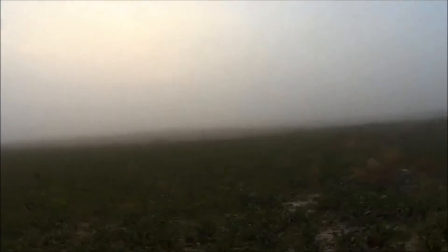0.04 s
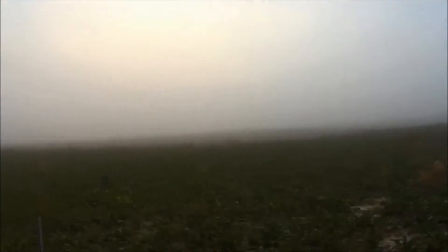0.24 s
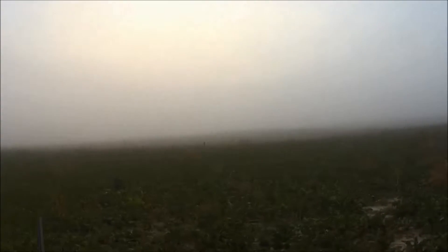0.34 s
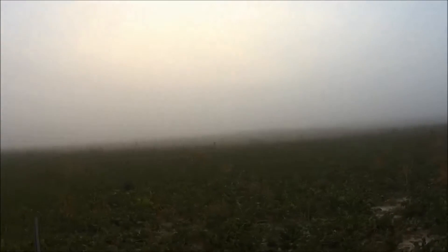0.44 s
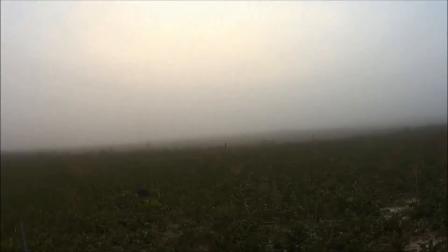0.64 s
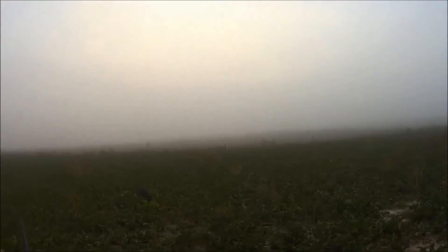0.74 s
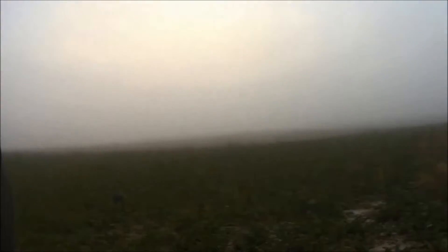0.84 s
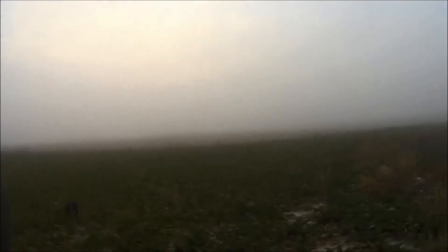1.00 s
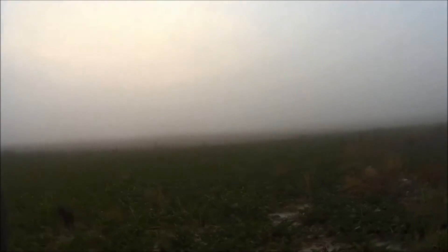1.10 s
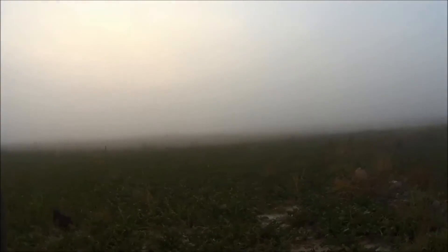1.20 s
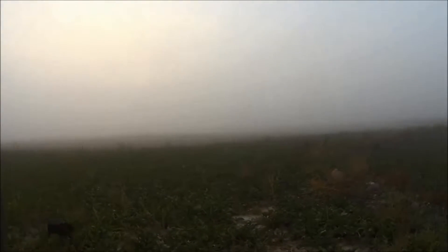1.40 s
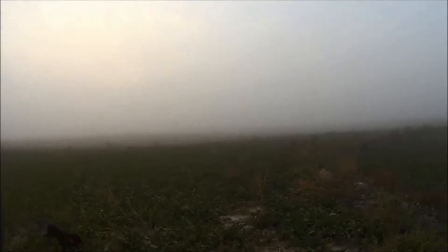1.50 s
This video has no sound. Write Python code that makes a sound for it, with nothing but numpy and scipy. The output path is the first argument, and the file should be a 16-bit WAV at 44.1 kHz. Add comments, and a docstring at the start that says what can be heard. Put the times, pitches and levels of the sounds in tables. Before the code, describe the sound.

An animal's small collar bell jangles in irregular runs over faintly rustling grass.

```python
"""An animal moves through rough grass in a hushed open field, a small sheet-metal bell on its collar.
From the start the clapper strikes and chatters in uneven runs; muffled, the low note goes flat and short.
Stalks snap, and from 0.25 s the grass swishes louder. Near 0.63 s a foot treads softly as a light wind
buffets the microphone. The strikes pause at 0.8 s and run again from 1.07 to 1.41 s.
A faint distant hum peaks near 1.5 s while the bell rings out."""
import sys
import numpy as np
from scipy import signal
from scipy.fft import rfft, irfft
from scipy.io import wavfile
from scipy.ndimage import uniform_filter1d

SR = 44100
rng = np.random.default_rng(int(sys.argv[2]) if len(sys.argv) > 2 else 0)


def store_wav(level_fs):
    """Save 16-bit WAV to argv[1]."""
    pcm = np.round(np.clip(np.atleast_2d(level_fs), -1, 1) * 32767)
    wavfile.write(sys.argv[1], SR, pcm.T.astype(np.int16))


N = 68355

# spectra of field hush, wind and grass: (frequency [Hz], relative density [dB])
HUSH_SPECTRUM = [(40, 6), (100, -2.5), (160, -6), (210, 1), (270, 2.5), (330, -2), (430, -1), (600, -2.5),
                 (900, -9.5), (2000, -6), (5000, -30.5), (11000, -62)]
WIND_SPECTRUM = [(15, -0.5), (28, -3), (50, 6.5), (75, -5), (100, -0.5), (150, -18), (300, -18.5),
                 (1000, -45)]
GRASS_SPECTRUM = [(150, 1.5), (500, 1.5), (1200, 0.5), (2500, 4), (4000, 2), (6000, 1), (7500, -10),
                  (9500, -6), (11000, -30)]
# hum fundamental and octave: (peak level [dB])
HUM_PARTIALS_DB = [-60, -61.5]
# wind strength: (time [s], relative level [dB])
WIND_GUSTS = [(0.0, -53.5), (0.158, -60), (0.518, -51), (0.63, -43.5), (0.828, -54), (0.84, -49),
              (1.052, -60), (1.476, -55.5), (1.55, -57)]
# movement through the grass: (time [s], relative level [dB])
GRASS_MOTION = [(0, -69), (.1, -66), (.15, -62), (.205, -67), (.25, -56), (.37, -55.5), (.42, -60),
                (.54, -58), (.6, -54), (.72, -55), (.82, -54.5), (.87, -57), (.96, -53.5), (1.01, -55),
                (1.05, -53.5), (1.1, -58), (1.2, -57.5), (1.3, -56), (1.42, -53.5), (1.55, -56.5)]
# stalk snaps and swishes: (time [s], level [dB], centre [Hz], decay [s])
STALK_SNAPS = [(.149, -46, 1500, .012), (.229, -42, 1400, .014), (.2927, -47, 4000, .003),
               (.329, -44, 5000, .003), (.335, -40, 4500, .002), (.371, -43, 4500, .004),
               (.503, -44, 6000, .002), (.519, -46, 5500, .003), (.572, -45, 4200, .025),
               (.8899, -43, 3800, .004), (.934, -45, 4500, .003), (1.0305, -36, 3800, .005),
               (1.065, -40, 4000, .005), (1.1533, -40, 4000, .003), (1.2235, -37, 2800, .002),
               (1.42, -43, 5500, .008), (1.428, -42, 5000, .003)]
# clapper strikes: (time [s], low note [Hz], low note t60 [s], rise [s], peaks of main modes 0-4 [dB])
CLAPPER_STRIKES = [(0.001, 1760.0, 0.16, 0.00067, -45, -64, -69.0, -83.0, -73),
                   (0.014, 1760.0, 0.18, 0.0025, -53, -57, -52.5, -83.0, -89),
                   (0.036, 1750.0, 0.07, 0.00033, -39, -54, -75, -69, -57),
                   (0.059, 1760.0, 0.033, 0.0014, -51, -74.0, -42, -77, -71),
                   (0.149, 1560.0, 0.015, 0.00029, -34.5, -63, -47, -73, -83.0),
                   (0.231, 1700.0, 0.019, 0.00038, -28.5, -61, -38.5, -34.5, -37.0),
                   (0.236, 1760.0, 0.12, 0.0047, -18.5, -33.5, -50.5, -45, -55),
                   (0.305, 1755.0, 0.23, 0.0024, -44.5, -49, -44.5, -42, -58),
                   (0.352, 1755.0, 0.52, 0.002, -41.5, -43.5, -43, -41.5, -45.5),
                   (0.371, 1680.0, 0.026, 0.0013, -28.5, -52, -57, -52, -39.5),
                   (0.46, 1745.0, 0.045, 0.0011, -20.5, -38, -44.5, -35.0, -38.5),
                   (0.486, 1748.0, 0.085, 0.0067, -26, -44, -49, -57, -76),
                   (0.5105, 1560.0, 0.014, 0.0022, -30.5, -54, -58, -72.0, -64),
                   (0.5255, 1630.0, 0.049, 0.0015, -27, -68, -77, -76, -87),
                   (0.5555, 1752.0, 0.07, 0.0058, -13.5, -40.5, -53.5, -36.5, -42.5),
                   (0.6685, 1760.0, 0.12, 0.001, -20, -35, -48, -39.5, -33),
                   (0.681, 1770.0, 0.045, 0.0038, -24.5, -55, -45.5, -52.0, -43.5),
                   (0.693, 1745.0, 0.079, 0.0023, -21, -61, -51, -48, -53),
                   (0.716, 1755.0, 0.15, 0.00092, -33.5, -74, -58, -59, -57),
                   (0.733, 1755.0, 0.16, 0.0014, -42, -66.0, -36, -63, -57),
                   (0.761, 1750.0, 0.095, 0.0014, -12.0, -37.5, -43.5, -33.5, -38),
                   (0.8005, 1725.0, 0.087, 0.001, -18.0, -40, -42, -37.5, -45.5),
                   (0.811, 1742.0, 0.11, 0.024, -25.5, -67, -81, -68, -77.5),
                   (1.065, 1755.0, 0.072, 0.0029, -21.5, -42.5, -49, -40, -49),
                   (1.088, 1750.0, 0.096, 0.0037, -30, -62.0, -53.5, -64, -72),
                   (1.121, 1605.0, 0.022, 0.0023, -21.5, -47, -43, -43.5, -56),
                   (1.1755, 1750.0, 0.1, 0.0034, -65, -40.5, -27.5, -36, -41.5),
                   (1.2385, 1745.0, 0.095, 0.002, -17.5, -39, -29, -40, -42),
                   (1.272, 1735.0, 0.12, 0.0005, -27, -39, -59, -36, -46),
                   (1.314, 1755.0, 0.082, 0.0024, -31, -49, -41.5, -44.5, -55),
                   (1.3655, 1750.0, 0.11, 0.00075, -27.5, -52, -43.5, -48, -50.5),
                   (1.414, 1760.0, 0.12, 0.0037, -41.0, -40, -40, -41.5, -57)]
# upper modes of the bell wall: (frequency [Hz])
WALL_MODE_HZ = [2186, 4522, 5093, 6328, 6522, 8007, 9292, 10977]
# per wall mode: (unmuffled t60 [s], level re its main mode [dB], left minus right [dB], left lead [rad])
WALL_MODES = [(0.086, -31.5, 10.5, -0.8), (0.072, -0.5, 2, -0.32), (0.066, 4, 2.1, -0.42),
              (0.36, -16, -1, -0.2), (0.051, -24.5, 6, 0.2), (0.094, -3, -3.3, -.3), (.12, 0.5, 0.5, 0.8),
              (.12, -26.5, -2, 0)]
# per wall mode: (main mode that sets its strength [index])
WALL_MAIN_MODE = [0, 1, 2, 1, 1, 3, 4, 4]
# per wall mode: (share of rattle and flutter [0-1])
WALL_ROUGHNESS = [.6, .9, .5, 1, 1, .9, 1, 1]

LOW_FREE_HZ = 1757  # unmuffled low note
TIME_S = np.arange(N) / SR


def undb(db):
    """Decibels to gain."""
    return 10 ** (np.asarray(db) / 20)


def unit(x):
    """Scale to rms 1."""
    return x / np.sqrt(np.mean(x ** 2))


def colour(x, spectrum):
    """Filter by (Hz, dB) points, to rms 1."""
    hz, db = np.array(spectrum).T
    bins_hz = np.maximum(np.fft.rfftfreq(N, 1 / SR), 1)
    gain = undb(np.interp(np.log(bins_hz), np.log(hz), db))
    return unit(irfft(rfft(x) * gain, N))


def band(x, hz, octaves):
    """Band-pass around a centre, to rms 1."""
    edges_hz = [hz / 2 ** (octaves / 2), min(hz * 2 ** (octaves / 2), SR / 2 - 1000)]
    return unit(signal.sosfilt(signal.butter(2, edges_hz, "band", fs=SR, output="sos"), x))


def walk(rate_hz):
    """Smooth random wander, rms 1."""
    width = int(SR / rate_hz)
    return unit(uniform_filter1d(uniform_filter1d(rng.standard_normal(N), width), width))


def stereo_noise(side_db):
    """White mid/side noise."""
    mid, side = rng.standard_normal((2, N))
    return mid + undb(side_db) * side * np.array([[1], [-1]])


def place(ring, pan_db, lead_rad):
    """Complex ring to stereo by level and phase difference."""
    side = np.array([[.5], [-.5]])
    return (ring * undb(pan_db * side) * np.exp(1j * lead_rad * side)).imag


def add(out, start_s, x):
    """Mix x into out from start_s."""
    i = max(int(start_s * SR), 0)
    n = min(x.shape[-1], N - i)
    out[..., i:i + n] += x[..., :n]


def fade(t, t60_s):
    """Exponential decay, 60 dB per t60_s."""
    return np.exp(-np.log(1000) * t / t60_s)


def ring_envelope(t, rise_s, t60_s, after_db, after_t60_s):
    """Struck mode: rise, decay and faint after-ring; peak 1."""
    env = (1 - np.exp(-t / rise_s)) * (fade(t, t60_s) + undb(after_db) * fade(t, after_t60_s))
    return env / env.max()


def field_hush():
    """Low, nearly steady noise of the open field."""
    level_db = -54 + .5 * walk(rate_hz=18)
    return undb(level_db) * colour(stereo_noise(side_db=-6.5), HUSH_SPECTRUM)


def distant_hum():
    """A faint wavering tone and its octave swell toward the end."""
    pitch_hz, peak_s, width_s = 293, 1.49, .52
    cycles = pitch_hz * np.cumsum(1 + .008 * walk(rate_hz=20)) / SR
    tone = sum(undb(db) * np.sin(2 * np.pi * k * cycles) for k, db in enumerate(HUM_PARTIALS_DB, 1))
    return tone * np.exp(-((TIME_S - peak_s) / width_s) ** 2)


def wind():
    """Gusts rumble on the microphone."""
    level_db = np.interp(TIME_S, *np.array(WIND_GUSTS).T) + 1
    return undb(level_db) * colour(stereo_noise(side_db=-15.5), WIND_SPECTRUM)


def footfall():
    """One dull, soft tread on turf."""
    level_db, peak_s, width_s = -48, .626, .018
    swell = np.exp(-((TIME_S - peak_s) / width_s) ** 2)
    return undb(level_db) * swell * band(stereo_noise(side_db=-24), hz=520, octaves=.97)


def grass():
    """Blades swish and crackle as they are brushed aside; stalks snap."""
    swish_db, crackle_db, grains_per_s, scatter_db = 4.5, 5.5, 900, 4
    motion_db = np.interp(TIME_S, *np.array(GRASS_MOTION).T) + 2 * walk(rate_hz=40)
    onsets = rng.random(N) < grains_per_s / SR
    grains = onsets * undb(scatter_db * np.minimum(rng.exponential(size=N), np.pi))
    grain_env = signal.lfilter([1], [1, -fade(1 / SR, t60_s=.0013)], grains)
    crackle = colour(grain_env * stereo_noise(side_db=-13), GRASS_SPECTRUM)
    swish = colour(stereo_noise(side_db=-1.5), GRASS_SPECTRUM)
    out = undb(motion_db) * (undb(swish_db) * swish + undb(crackle_db) * crackle)
    for start_s, db, hz, decay_s in STALK_SNAPS:
        snap = band(stereo_noise(side_db=-30.5), hz, octaves=1.56)
        add(out, start_s, undb(db) * np.exp(-TIME_S / decay_s) * snap)
    return out


def clapper_ticks():
    """Metal scrapes briefly on metal at each strike, scaled to main modes 1-4."""
    relative_db, decay_s = -7.5, .0072
    env, t = np.zeros(N), TIME_S[:SR // 10]
    for start_s, _, _, _, _, *upper_db in CLAPPER_STRIKES:
        add(env, start_s, np.linalg.norm(undb(upper_db)) * np.exp(-t / decay_s))
    return undb(relative_db) * env * band(stereo_noise(side_db=-4.5), hz=5430, octaves=1.07)


def bell_wall_modes():
    """Strikes ring the upper modes; the loose clapper rattles along the wall and roughens each onset."""
    rattle_depth, rattle_hz, rattle_decay_s, flutter_hz = .7, 230, .09, 26
    muffle_hz = 125  # a low note this flat halves the ring time
    out, t = 0, TIME_S[:SR // 2]
    for hz, mode, main, share in zip(WALL_MODE_HZ, WALL_MODES, WALL_MAIN_MODE, WALL_ROUGHNESS):
        t60_s, relative_db, pan_db, lead_rad = mode
        depth = share * rattle_depth * np.exp(-t / rattle_decay_s)
        clean_energy, rough_energy = np.zeros((2, N))
        for start_s, low_hz, _, rise_s, *main_db in CLAPPER_STRIKES:
            damping = 1 + abs(LOW_FREE_HZ - low_hz) / muffle_hz
            env = ring_envelope(t * damping, rise_s, t60_s, after_db=-12, after_t60_s=.4)
            energy = (undb(main_db[main] + relative_db) * env) ** 2
            add(clean_energy, start_s, energy * (1 - depth ** 2))
            add(rough_energy, start_s, energy * depth ** 2)
        rattle = (walk(rattle_hz) + 1j * walk(rattle_hz)) / np.sqrt(2)
        amplitude = np.sqrt(clean_energy) + np.sqrt(rough_energy) * rattle
        cycles = np.cumsum(hz + share * flutter_hz * walk(rattle_hz)) / SR
        out = out + place(amplitude * np.exp(2j * np.pi * cycles), pan_db, lead_rad)
    return out


def bell_low_note():
    """The lowest mode dies quickly, leaving a faint ring that settles on the free pitch."""
    settle_s = .0293
    out, t = np.zeros(N, complex), TIME_S[:SR // 2]
    for start_s, struck_hz, t60_s, rise_s, peak_db, *_ in CLAPPER_STRIKES:
        env = ring_envelope(t, rise_s, t60_s, after_db=-35.5, after_t60_s=.46)
        pitch_hz = LOW_FREE_HZ + (struck_hz - LOW_FREE_HZ) * np.exp(-(t / settle_s) ** 2)
        cycles = np.cumsum(pitch_hz) / SR
        add(out, start_s, undb(peak_db) * env * np.exp(2j * np.pi * cycles))
    return place(out, pan_db=3.6, lead_rad=-.6)


def scene():
    """Bell, movement and air, in stereo."""
    bell = bell_low_note() + bell_wall_modes() + clapper_ticks()
    return bell + grass() + footfall() + field_hush() + distant_hum() + wind()


def record(dry):
    """Steep elliptic low-pass."""
    cutoff_hz = 11150
    return signal.sosfilt(signal.ellip(10, .2, 70, cutoff_hz, fs=SR, output="sos"), dry)


dry = scene()
out = record(dry)
store_wav(out)
```